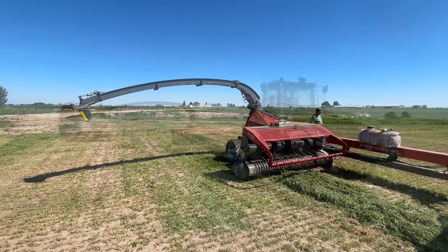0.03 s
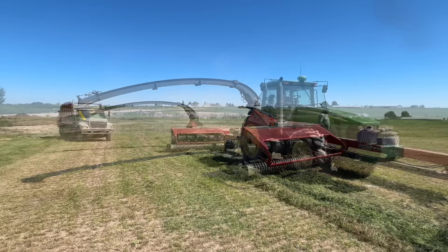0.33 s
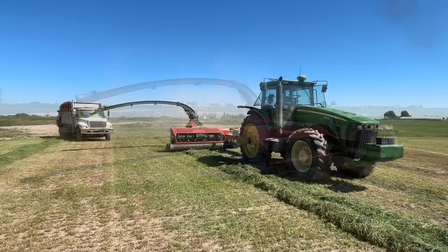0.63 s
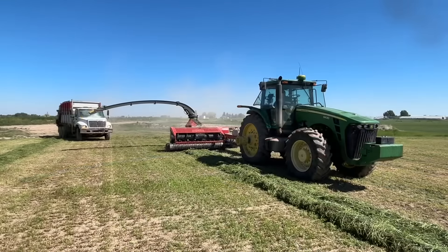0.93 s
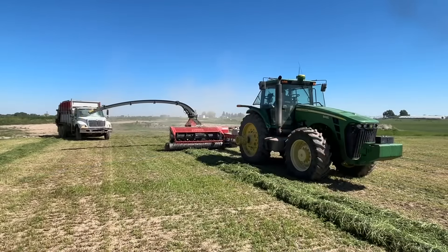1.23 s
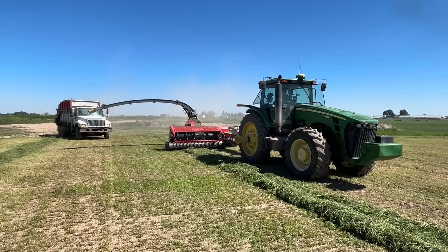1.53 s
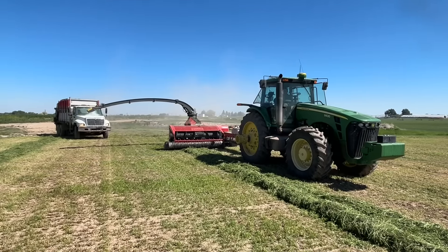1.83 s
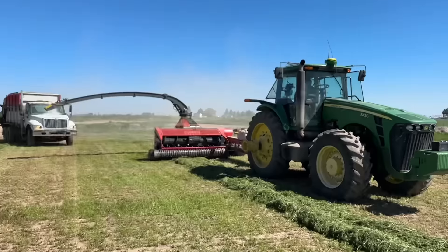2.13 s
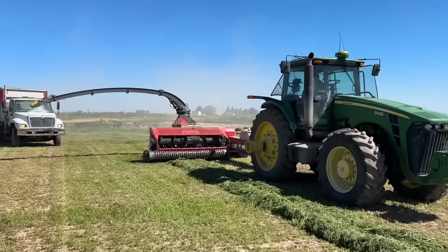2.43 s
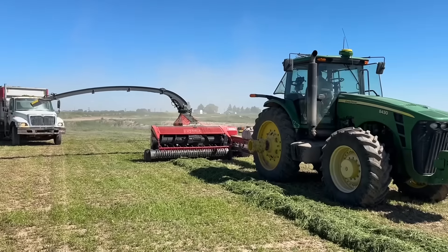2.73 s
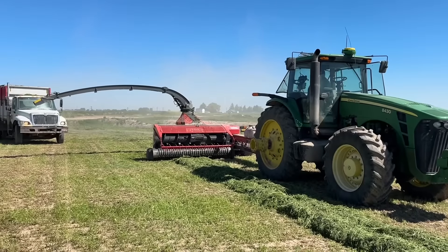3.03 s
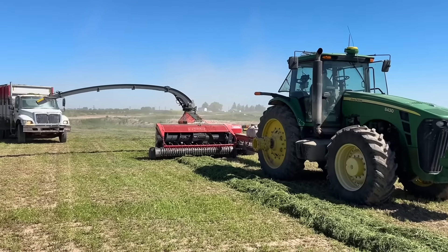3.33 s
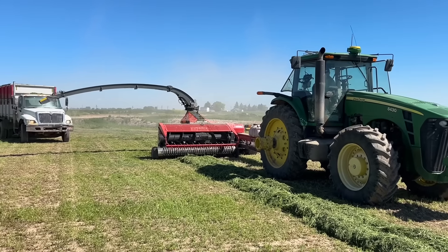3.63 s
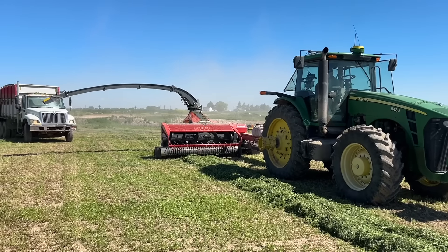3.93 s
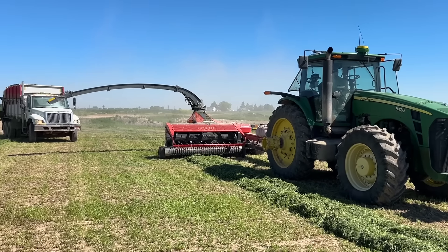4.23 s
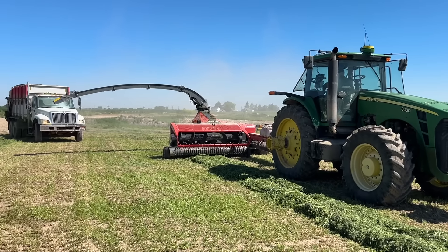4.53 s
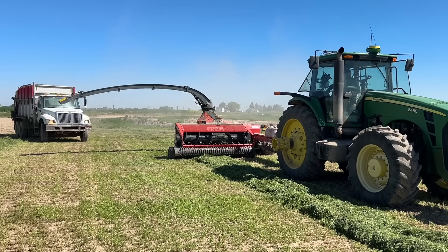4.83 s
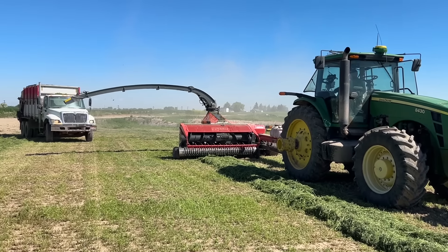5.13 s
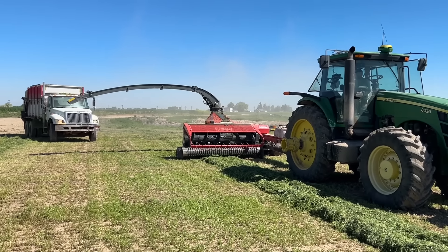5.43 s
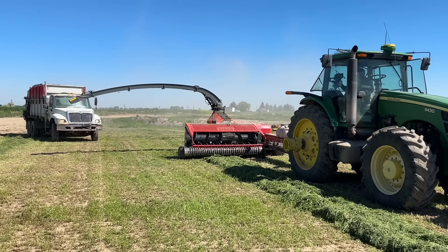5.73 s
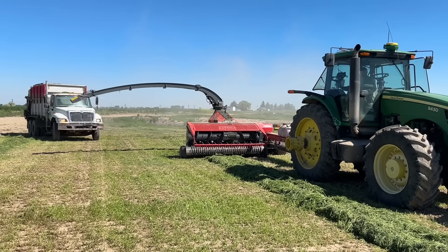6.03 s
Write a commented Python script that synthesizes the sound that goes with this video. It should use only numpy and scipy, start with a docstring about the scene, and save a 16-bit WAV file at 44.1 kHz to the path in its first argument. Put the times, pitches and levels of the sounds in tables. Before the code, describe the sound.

In an open field without echo, the low drone and rumble of a forage chopper rise together with the throb and clatter of the diesel tractor pulling it. Chopped grass sprays out in a fine hiss. After about two seconds both machines sound nearer and a little louder. A clump of grass passes with a brief rush, the load eases, a gear whine fades, and the engine runs on steadily, a touch faster.

```python
"""A six-cylinder diesel tractor pulls a grass chopper across an open field; the whole sound swells in from the
start. Its exhaust throbs, each firing makes the engine clatter, a gear whines and the fan's hum slowly sinks.
Behind it the knives drone, the blower hums and cut grass hisses out of the spout. At about 2 s the machines
come close. Near 3.7 s a thick wad of grass goes through, then a thin patch; the load eases, the whine drops
away and the engine speeds up a little."""
import sys
import numpy as np
from scipy import signal
from scipy.fft import rfft, irfft, next_fast_len
from scipy.io import wavfile
from scipy.ndimage import map_coordinates

SR = 44100
rng = np.random.default_rng(int(sys.argv[2]) if len(sys.argv) > 2 else 0)


def wav_out(sig):
    """Save sig, one row per channel (or a flat mono array), as 16-bit PCM at SR to the path in sys.argv[1]."""
    wavfile.write(sys.argv[1], SR, np.round(np.clip(np.atleast_2d(sig).T, -1, 1) * 32767).astype(np.int16))


N = 267687
TIME = np.arange(N) / SR
BINS = np.fft.rfftfreq(next_fast_len(N + 4096, True), 1 / SR)  # the frequencies of a spectrum, in Hz

# how much louder the left is than the right: f/Hz, level/dB
LEFT_LOUDER = [(60, 0), (140, 0), (330, -1.8), (500, -1.3), (770, -3), (1170, 0), (1790, -3), (2740, -1.5),
               (4190, 2.2), (6410, 1.8), (9810, 0), (15000, 0)]
# how far the right lags the left for the side clatter, the rumble and the panels: f/Hz, lag/rad
COMMON_LAG = [(0, 0), (1030, -0.1), (1640, -0.7), (2670, 0.9), (5680, -0.2), (7490, 0.0), (9040, -2.7),
              (10900, -3.5), (11800, -6.1), (13500, -6.3), (14600, -8.8), (15400, -9.6)]


def from_db(db):
    """Turn decibels into a number to multiply by."""
    return 10 ** (np.asarray(db) / 20)


def rms_one(x):
    """Scale a signal to an average power of 1."""
    return x / np.sqrt(np.mean(x ** 2) + 1e-20)


def in_time(points):
    """Read a table over time at every sample."""
    return np.interp(TIME, *np.transpose(points))


def at_bins(points):
    """Read a table over frequency at every bin."""
    hz, value = np.transpose(points)
    return np.interp(np.log(BINS + 1), np.log(hz), value)


def white():
    """Fresh white noise."""
    return rng.standard_normal(N)


def drift(rate):
    """A smooth random wobble of size about 1 that changes about rate times a second."""
    pole = np.exp(-80 * np.pi * rate / SR)
    noise = rng.standard_normal(N // 40 + 2002)  # one value per 40 samples
    slow = signal.lfilter([1], [1, -2 * pole, pole * pole], noise)[2000:]
    return np.interp(np.arange(N) / 40, np.arange(len(slow)), rms_one(slow))


def turns_of(hz, wobble, wobble_rate):
    """Count the turns made so far by something whose speed wobbles slightly."""
    return np.cumsum(hz * (1 + wobble * drift(wobble_rate))) / SR


def tones(turns, table, waver_db, waver_rate, overtone_db=0):
    """Tones of a turning part, each wavering on its way through the air; overtone_db shifts overtones."""
    out = np.zeros(N)
    for multiple, db in table:
        angle = 2 * np.pi * (multiple * turns + rng.random())
        level_db = db + waver_db * drift(waver_rate) + (multiple > 1) * overtone_db
        out += from_db(level_db) * np.sqrt(2) * np.sin(angle)
    return out


def stereo_noise(direct, scattered, colour_db, lag, likeness=None):
    """Mix two noises into a partly alike left and right, shape their spectrum and let the right lag."""
    # how alike left and right usually are: f/Hz, likeness/0-1
    usual_likeness = [(100, 0.99), (250, 0.86), (500, 0.98), (1000, 0.87), (1650, 0.35), (2000, 1),
                      (4000, 0.8), (5700, 0.81), (6800, 0.47), (8400, 1), (9700, 1), (11200, 0.98),
                      (12600, 0.77), (14300, 0.72)]
    alike = np.clip(at_bins(likeness or usual_likeness), 0, 1)
    size = 2 * (len(BINS) - 1)
    sides = np.array([[1], [-1]])
    pair = np.sqrt(1 + alike) * rfft(direct, size) + sides * np.sqrt(1 - alike) * rfft(scattered, size)
    pair *= from_db(colour_db + sides * at_bins(LEFT_LOUDER) / 2)
    pair[1] *= np.exp(-1j * np.interp(BINS, *np.transpose(lag)))
    return rms_one(irfft(pair, size)[:, :N])


def placed(x, lead_s, shade):
    """A hum reaches the left lead_s before the right; shade scales the level gap between the two."""
    size = 2 * (len(BINS) - 1)
    pair = rfft(np.array([x, np.interp(TIME - lead_s, TIME, x)]), size)
    sides = np.array([[1], [-1]])
    return irfft(pair * from_db(shade * sides * at_bins(LEFT_LOUDER) / 2), size)[:, :N]


def ramp(start_s, length_s):
    """A straight rise from 0 to 1."""
    return np.clip((TIME - start_s) / length_s, 0, 1)


def bump(at_s, width_s):
    """A smooth hill of height 1."""
    return np.exp(-((TIME - at_s) / width_s) ** 2)


def heard(facing, db, nose_db, close_db, eased_db, swell):
    """A source's gain, changed head-on, close by and under light load; swell steepens its first rise."""
    rise = 0.28 + 0.72 * ramp(0, 0.79) + 0.12 * bump(1, 0.51)  # overshoots a little, then settles
    close = ramp(start_s=1.94, length_s=0.25)
    eased = ramp(start_s=3.72, length_s=0.22)
    return rise ** swell * from_db(db + nose_db * facing + close_db * close + eased_db * eased)


def exhaust(cycles, facing):
    """The exhaust throbs with low tones locked to the engine's cycle."""
    # exhaust tones: multiple of the cycle rate, level/dB
    exhaust_tones = [(3, -8.5), (5, -11.5), (6, -8), (9, -17), (17, -23), (18, 0), (19, -12.5), (20, -18.5),
                     (21, -16), (22, -10)]
    throb = tones(cycles, exhaust_tones, waver_db=0.56, waver_rate=2.0)
    throb *= heard(facing, db=-29.5, nose_db=0.2, close_db=1.0, eased_db=0.0, swell=0.73)
    return placed(throb, lead_s=-6e-5 * facing, shade=0.85)


def knocks(cycles, decay, chance_db):
    """Six firings a cycle: each cylinder has its own strength, and its knock fades until the next."""
    firings = 6 * cycles
    count = firings.astype(int)
    cylinder_db = np.array([0.3, -1.5, 0.18, -0.99, 0.92, 0.35])
    strength = from_db(cylinder_db[count % 6] + chance_db * rng.standard_normal(1024)[count])
    return rms_one(strength * np.exp(-(firings % 1) / decay))


def clatter(cycles, knock, depth, repeat):
    """Valves, injectors and pistons rattle partly alike in every cycle, hardest at each firing."""
    pattern = rng.standard_normal(2048)
    repeating = rms_one(map_coordinates(pattern, [cycles % 1 * len(pattern)], order=3, mode="grid-wrap"))
    pulse = np.sqrt(1 - depth + depth * knock ** 2)
    direct = np.sqrt(repeat) * repeating + np.sqrt(1 - repeat) * white()
    return pulse * direct, pulse * white()


def engine_block(cycles, knock, facing):
    """The engine throws clatter and gear and pump tones from its nose and, heard later, its side."""
    # the clatter's spectrum from the nose and from the side: f/Hz, level/dB
    nose_colour = [(250, -23), (450, -8.5), (620, 1), (820, -1), (1100, -10), (1350, -5), (1550, -5),
                   (1720, -12.5), (1860, -4), (2120, -5), (2380, -11), (2750, -8), (3150, -16.5),
                   (4700, -20), (6000, -24), (9000, -47)]
    side_colour = [(250, -38), (450, -8), (560, 2), (750, -5.5), (1050, -6.5), (1250, -8.5), (1480, -5),
                   (1700, -11), (1900, -10.5), (2400, -12), (2850, -13.5), (3150, -16), (4300, -24),
                   (5700, -38), (9000, -65)]
    # gear and pump tones: multiple of the cycle rate, level/dB against the clatter
    nose_tones = [(30, -14.5), (38, -15), (69, -46), (75, -21.5), (76, -21.5), (82, -32.5), (87, -18),
                  (112, -27), (142, -24)]
    side_tones = [(27, -11.5), (29, -14.5), (30, -13), (33, -15), (37, -20.5), (39, -15.5), (46, -22),
                  (49, -22), (65, -27), (66, -17), (69, -14), (70, -20), (75, -17.5), (77, -19), (82, -17),
                  (100, -24), (101, -19), (109, -25.5), (172, -30)]
    # how far the right lags the left for the nose's clatter: f/Hz, lag/rad
    nose_lag = [(0, 0), (1640, -0.88), (2410, 1.3), (3360, 3), (4480, -5.3), (5430, -4.5), (6720, -12),
                (8440, -15.4), (10200, -23), (11900, -18.7), (13700, -19.1), (15400, -22.6)]
    # how alike that clatter is left and right: f/Hz, likeness/0-1
    nose_likeness = [(250, 0.7), (600, 0.88), (1100, 0.86), (1400, 0.88), (1700, 0.3), (2000, 1), (2250, 0),
                     (2600, 0.4), (3200, 0.7), (4000, 1), (6000, 0)]
    nose_rattle = clatter(cycles, knock, depth=0.34, repeat=0.26)
    nose = stereo_noise(*nose_rattle, at_bins(nose_colour), nose_lag, nose_likeness)
    nose += tones(cycles, nose_tones, waver_db=0.5, waver_rate=7.5)
    side_rattle = clatter(cycles, knock, depth=0.074, repeat=0.37)
    side = stereo_noise(*side_rattle, at_bins(side_colour), COMMON_LAG)
    side += tones(cycles, side_tones, waver_db=1.7, waver_rate=4.0)
    block = np.sqrt(facing) * nose + np.sqrt(1 - facing) * side
    return block * heard(facing, db=-31.0, nose_db=3.0, close_db=0.5, eased_db=-0.74, swell=0.77)


def gear_whine(cycles, knock, facing):
    """Gear teeth make one high tone, shaken by the firings; it drops away when the load eases."""
    teeth_per_cycle = 114
    whine = tones(teeth_per_cycle * cycles, [(1, 0)], waver_db=2.5, waver_rate=21)
    whine *= rms_one(1 + 0.37 * knock)
    whine *= heard(facing, db=-41.0, nose_db=0.2, close_db=-1.3, eased_db=-13.5, swell=1.8)
    return placed(whine, lead_s=-6.4e-6, shade=1.8)


def cooling_fan(engine_hz, facing):
    """The fan's clutch slips more and more, so its hum sinks; overtones beam out of the front grille."""
    # the fan's speed against the engine's: t/s, blade passes per cycle
    fan_drive = [(0, 12.52), (.9, 11.6), (1.8, 10.77), (2.6, 10.13), (3.9, 9.88), (6.07, 9.39)]
    # fan tones: multiple of the blade rate, level/dB
    fan_tones = [(1, 0), (2, -12), (3, -20.5), (4, -23.5)]
    passes = turns_of(in_time(fan_drive) * engine_hz, wobble=0.0015, wobble_rate=6)
    hum = tones(passes, fan_tones, waver_db=0.26, waver_rate=6.0, overtone_db=-9 * (1 - facing))
    gain = heard(facing, db=-22.0, nose_db=1.0, close_db=3.0, eased_db=-0.7, swell=1.0)
    return gain * placed(hum, lead_s=-0.00017, shade=0.47)


def chopper(engine_hz, facing):
    """Knives sweep past a bar, duller while the tractor hides them; their shaft also drives the blower."""
    # knife tones: multiple of the knife rate, level/dB
    knife_tones = [(1, 0), (2, -13), (3, -23.5)]
    # blower tones: multiple of its shaft rate, level/dB against the knives
    blower_tones = [(1, -31.5), (2, -41), (5, -10), (10, -29)]
    cuts_per_cycle, blades_per_cut, blower_blades = 7.21, 1.7205, 5
    cuts = turns_of(cuts_per_cycle * engine_hz, wobble=0.001, wobble_rate=6)
    knives = tones(cuts, knife_tones, waver_db=0.43, waver_rate=5.4, overtone_db=-6 * facing)
    blower = tones(cuts * blades_per_cut / blower_blades, blower_tones, waver_db=1.0, waver_rate=4.2)
    gain = heard(facing, db=-18.5, nose_db=0.26, close_db=1.87, eased_db=-1.4, swell=1.27)
    return gain * placed(knives + blower, lead_s=6e-5 * facing, shade=0.66)


def stalks(per_s, size_db, air, clump_db):
    """Bits of stalk tick against steel in clumps, over the rush of the air."""
    sizes = from_db(size_db * np.minimum(rng.exponential(1, N), 4)) * rng.choice([-1, 1], N)
    ticks = rms_one(sizes * (rng.random(N) < per_s / SR))
    flow = from_db(clump_db * drift(23))
    return flow * (ticks + air * white()), flow * white()


def housing(facing):
    """Grass rumbles through the chopper's housing and makes its steel panels ring."""
    # the rumble's spectrum: f/Hz, level/dB
    rumble_colour = [(18, -29), (34, -20), (45, -5.5), (70, -2.5), (100, -2.5), (155, 7.5), (200, -1.5),
                     (280, -1), (380, -2), (480, -13), (900, -81)]
    # where the panels ring: f/Hz, width/Hz, level/dB
    panel_rings = [(2814, 55, 7.5), (3465, 204, 1.5), (4034, 126, 2), (4420, 64, 3.5), (4757, 120, 1.5),
                   (5070, 46, 2.5), (5290, 94, -2)]
    rumble = stereo_noise(white(), white(), at_bins(rumble_colour), COMMON_LAG)
    rumble *= heard(facing, db=-28.5, nose_db=2.5, close_db=1.3, eased_db=0.6, swell=0.65)
    chaff = stalks(per_s=2500, size_db=3.0, air=0.84, clump_db=0.5)
    power = sum(from_db(db) ** 2 / (1 + ((BINS - hz) / width) ** 2) ** 2 for hz, width, db in panel_rings)
    panels = stereo_noise(*chaff, 10 * np.log10(power), COMMON_LAG) * grass_wad(wad_db=4.0, thin_db=2.0)
    panels *= heard(facing, db=-42.0, nose_db=-4.5, close_db=1.46, eased_db=-1.5, swell=1.0)
    return rumble + panels


def spout(facing):
    """Cut grass flies out of the spout: coarse bits hiss, fine bits make a higher spray."""
    # the spectra of hiss and spray: f/Hz, level/dB
    hiss_colour = [(2000, -9), (3500, -5.5), (4800, -13), (5600, -3), (6300, 1), (7600, 0.5), (8700, -0.5),
                   (9250, 5), (10400, -19), (11500, -19), (14000, -33)]
    spray_colour = [(8500, -54), (10500, -2), (11400, -10), (12800, -9), (13400, -12.5), (14000, -1.5),
                    (14700, -6.5), (15400, -16), (16500, -28)]
    # how far the right lags the left: f/Hz, lag/rad
    spout_lag = [(3500, .5), (5800, -.3), (7400, -.1), (8400, -1.5), (9400, -3.0), (10400, -3.3),
                 (11900, -6.1), (13400, -6.3), (14300, -7.7), (15000, -9.3)]
    coarse = stalks(per_s=1400, size_db=0.0, air=2.1, clump_db=0.86)
    hiss = stereo_noise(*coarse, at_bins(hiss_colour), spout_lag) * grass_wad(wad_db=3.0, thin_db=0.0)
    hiss *= heard(facing, db=-49.5, nose_db=0.0, close_db=7.0, eased_db=-0.2, swell=0.77)
    fine = stalks(per_s=900, size_db=1.0, air=1.7, clump_db=1.3)
    spray = stereo_noise(*fine, at_bins(spray_colour), spout_lag) * grass_wad(wad_db=2.5, thin_db=-5.0)
    spray *= heard(facing, db=-45.0, nose_db=1.3, close_db=0.9, eased_db=-1.0, swell=0.93)
    return hiss + spray


def grass_wad(wad_db, thin_db):
    """The gain as one thick wad of grass passes and a thin patch follows it."""
    return from_db(wad_db * bump(at_s=3.65, width_s=0.04) + thin_db * bump(at_s=3.77, width_s=0.07))


def scene():
    """One engine drives everything, in an open field with no echoes."""
    # engine speed, nearly steady until the load eases: t/s, four-stroke cycle rate/Hz
    engine_speed = [(0, 17.9), (.7, 17.83), (1.5, 17.95), (2.2, 17.91), (3.5, 17.91), (3.9, 18.19),
                    (4.3, 18.28), (6.07, 18.25)]
    # how the tractor faces the listener: t/s, share of the clatter from its nose/0-1
    nose_share = [(0, 0.82), (.8, 1), (1.9, 0.94), (2.4, 0.44), (3.5, 0.13), (4.1, 0.1), (6.07, 0)]
    engine_hz, facing = in_time(engine_speed), in_time(nose_share)
    cycles = turns_of(engine_hz, wobble=0.0005, wobble_rate=5)
    knock = knocks(cycles, decay=0.86, chance_db=2.0)
    engine = exhaust(cycles, facing) + engine_block(cycles, knock, facing)
    tractor = engine + gear_whine(cycles, knock, facing) + cooling_fan(engine_hz, facing)
    return tractor + chopper(engine_hz, facing) + housing(facing) + spout(facing)


def record(dry):
    """Cut away the very highest treble steeply."""
    cutoff_hz = 15400
    return signal.sosfilt(signal.ellip(10, .1, 90, cutoff_hz, fs=SR, output="sos"), dry)


dry = scene()
out = record(dry)
wav_out(out)
```